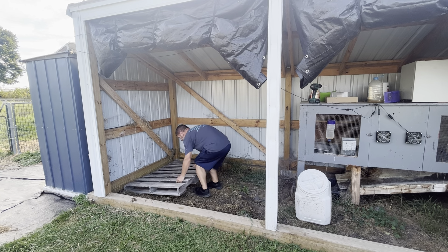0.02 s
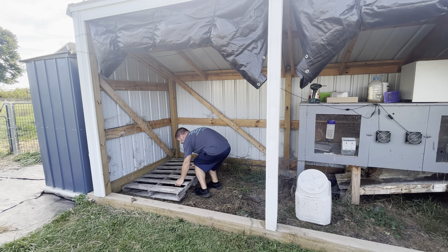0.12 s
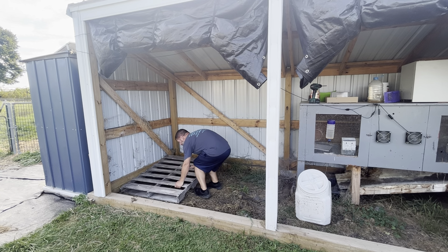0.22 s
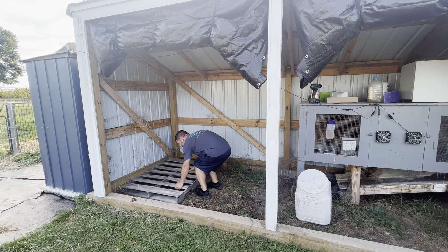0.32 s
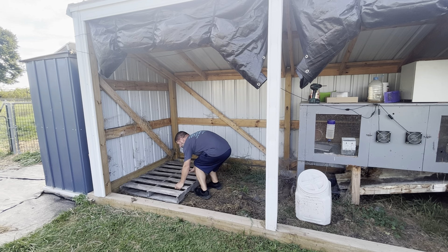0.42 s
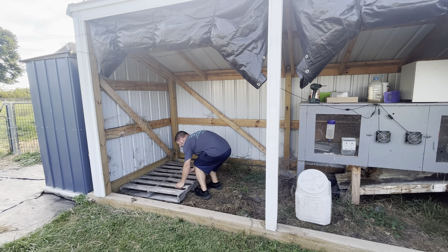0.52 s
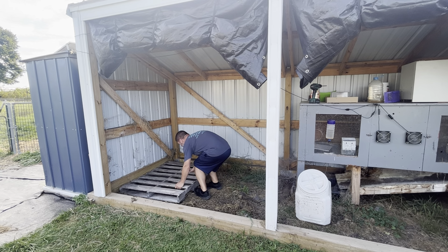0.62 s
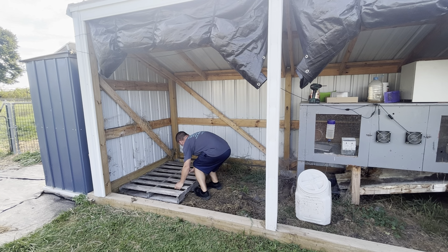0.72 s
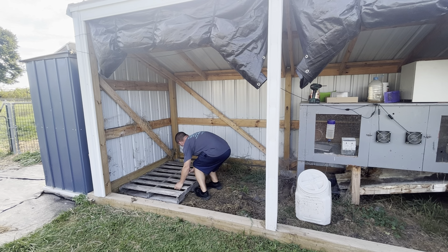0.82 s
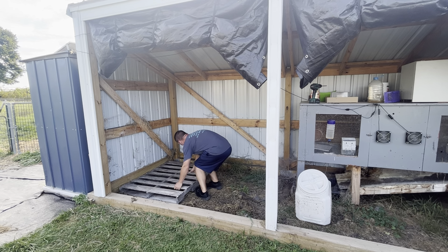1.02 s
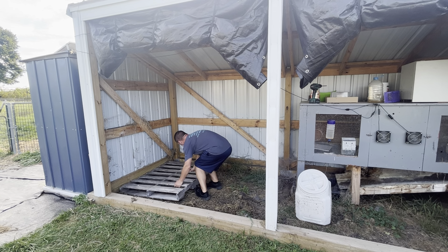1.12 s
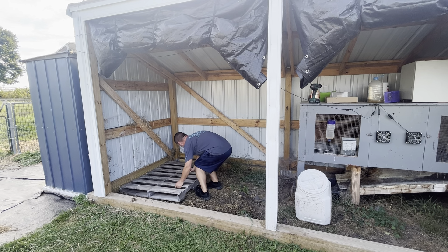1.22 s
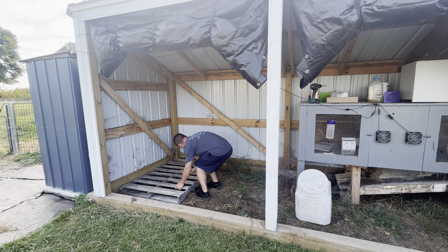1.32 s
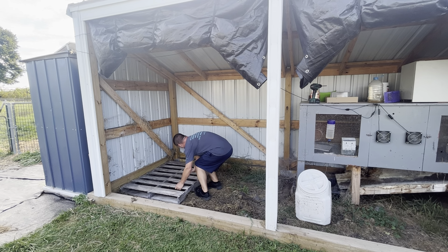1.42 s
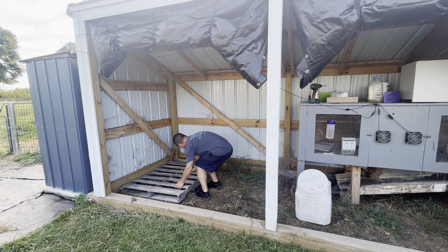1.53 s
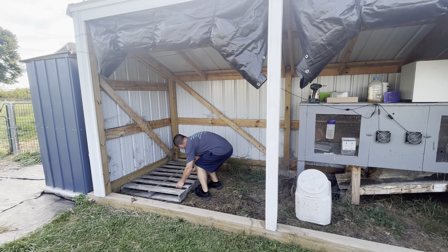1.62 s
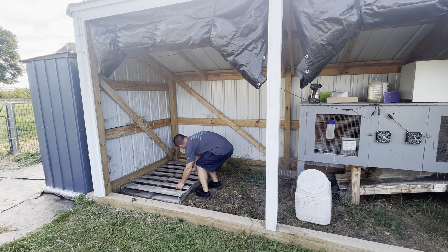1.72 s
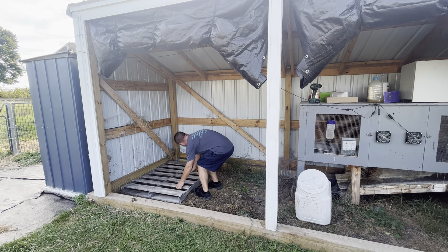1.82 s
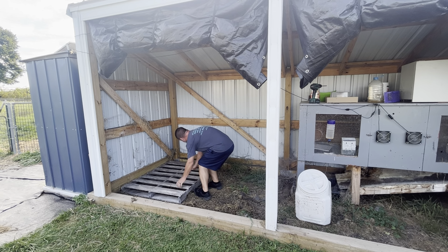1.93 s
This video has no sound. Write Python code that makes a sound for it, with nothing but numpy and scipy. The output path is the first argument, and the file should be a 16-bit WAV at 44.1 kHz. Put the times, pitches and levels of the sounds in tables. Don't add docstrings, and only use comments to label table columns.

```python
import sys
import numpy as np
from scipy import signal
from scipy.fft import rfft, irfft, next_fast_len
from scipy.io import wavfile
from scipy.ndimage import uniform_filter1d

SR = 44100
rng = np.random.default_rng(int(sys.argv[2]) if len(sys.argv) > 2 else 0)


def undo_db(level):
    steps = np.asarray(level, float) / 20
    return 10 ** steps


def waveform_to_disk(signal):
    frames = np.transpose(np.atleast_2d(signal))
    scaled = np.clip(frames, -1, 1) * 32767
    samples = np.round(scaled).astype(np.int16)
    wavfile.write(sys.argv[1], SR, samples)


N = 85995


def at(table, hz):
    points = np.array(table)
    return np.interp(np.log(hz + 1), np.log(points[:, 0]), points[:, 1])


def unit(x):
    return x / np.sqrt(np.mean(x ** 2))


def colour(x, gain):
    n = next_fast_len(x.shape[-1] + 4096, True)
    spectrum = rfft(x, n) * gain(np.fft.rfftfreq(n, 1 / SR))
    return irfft(spectrum, n)[..., :x.shape[-1]]


def pair(size):
    # frequency in Hz, likeness of the channels from 0 to 1.
    alike = [(40, 0.77), (125, 0.98), (300, 0.72), (600, 0.033), (2000, 0.47), (8000, 0.067), (12000, 0.65)]
    likeness = lambda hz: np.clip(at(alike, hz), 0, 1)
    mid, side = rng.standard_normal((2, size))
    mid = colour(mid, lambda hz: np.sqrt(1 + likeness(hz)))
    side = colour(side, lambda hz: np.sqrt(1 - likeness(hz)))
    return np.array([mid + side, mid - side]) / np.sqrt(2)


def walk(rate):
    hold = int(SR / rate)
    steps = np.repeat(rng.standard_normal(N // hold + 1), hold)
    return unit(uniform_filter1d(uniform_filter1d(steps, hold), hold)[:N])


def pan(db):
    return undo_db(np.array([[db / 2], [-db / 2]]))


def air():
    # frequency in Hz, level in dB per Hz.
    air_curve = [(25, -35), (45, -11), (100, 4.5), (200, -6), (350, -24.5), (1500, -26), (6000, -37),
                 (14000, -42.5)]
    floor = colour(pair(N), lambda hz: undo_db(at(air_curve, hz)) * (hz > 22))
    return undo_db(-47 + walk(2.8)) * unit(floor)


def far_chorus():
    # centre in Hz, width in Hz, level in dB, throbs per second, throb depth in dB,
    # left minus right in dB.
    chorus = [
        (4830, 890, -61, 32, 2.5, 5),
        (8190, 1660, -56.5, 120, 2, -5),
        (8636, 1680, -60.5, 240, -2, -14.5),
    ]
    out = 0
    for centre_hz, width_hz, db, rate, throb_db, pan_db in chorus:
        band = unit(colour(pair(N), lambda hz: 1 / (1 + ((hz - centre_hz) / width_hz * 2) ** 4)))
        out = out + undo_db(db + throb_db * walk(rate) + 0.5 * walk(2.6)) * band * pan(pan_db)
    return out


def scuffs():
    # start in seconds, length in seconds, level in dB, tilt in dB per octave.
    scuff_rows = [
        (-.05, 0.96, -50, -4.5),
        (0.241, 0.092, -26, -10),
        (0.382, 0.088, -29.5, -25),
        (0.464, 0.11, -40.5, -10),
        (.85, 0.15, -54, -5.5),
        (1.15, 0.056, -50.5, -9.5),
        (1.277, .11, -51.5, -5),
        (1.648, 0.12, -38.5, -10),
    ]
    t, out = np.arange(N) / SR, 0
    for start, length, db, tilt_db in scuff_rows:
        tilt = lambda hz: undo_db(tilt_db * np.log2(hz / 1000 + 0.5)) * hz / (hz + 500)
        hiss = unit(colour(pair(N), tilt))
        swell = np.sin(np.pi * np.clip((t - start) / length, 0, 1) ** 0.56)
        out = out + undo_db(db + 2 * walk(120)) * swell * hiss
    return out


def shower(start, t60, per_s):
    t = np.arange(N) / SR - start
    scatter_db = 6
    size = undo_db(scatter_db * np.tanh(rng.standard_normal(N))) * rng.choice([-1, 1], N)
    hits = rng.random(N) < per_s / SR
    return hits * size * (t > 0) * undo_db(-60 * np.maximum(t, 0) / t60)


def push(t, contact_ms):
    contact_s = contact_ms / 1000
    return np.maximum(t, 0) / contact_s ** 2 / SR * np.exp(-np.abs(t) / contact_s)


def blow_forces():
    # start in seconds, level in dB, contact in ms, rattle level in dB, rattle t60 in seconds.
    blows = [(0.011, -53, 0.31, 1.5, 0.13), (0.2459, -9.5, 0.14, -10.5, 0.39),
             (0.365, -18, 0.74, -13, 0.76), (0.425, -30.5, 0.36, -7.5, 0.86), (0.543, -37.5, .6, 0, 0.55),
             (.654, -66, .6, -14, 0.52), (1.158, -20, 0.69, -17, 0.46), (1.181, -22, 0.86, -15.5, 0.29),
             (1.232, -29.5, 0.79, -14, 0.82), (1.6218, -14, .5, -14.5, 0.26), (1.646, -24, 0.65, -8, 0.46),
             (1.717, -31.5, 0.48, -6, 0.36), (1.761, -34, 0.87, -9, 0.3), (1.894, -48.5, 0.24, -12, 0.1)]
    t, out = np.arange(N) / SR, np.zeros(N)
    for start, db, contact_ms, rattle_db, t60 in blows:
        clicks = shower(start, t60, per_s=500)
        rattle = signal.oaconvolve(clicks, push(t[:400], contact_ms * 0.63))[:N]
        out += undo_db(db) * (push(t - start, contact_ms) + undo_db(rattle_db - 3) * rattle)
    return out


def bend(blows):
    late_s, knee_hz = 0.00768, 136
    return colour(blows, lambda hz: np.exp(-2j * np.pi * late_s * knee_hz * np.log(1 + hz / knee_hz)))


def nudge_gain(db):
    nudges_from_s = 1.1
    return np.where(np.arange(N) / SR < nudges_from_s, 1, undo_db(db))


def ring(x, hz, t60):
    pole = np.exp(2j * np.pi * hz / SR - np.log(1000) / (t60 * SR))
    return signal.lfilter([1], [1, -pole], x).imag


def wood(force):
    # frequency in Hz, level in dB, t60 in seconds, left minus right in dB.
    pallet_modes = [(151.6, -13, 0.25, -3), (241.3, -2, 0.11, -2), (287.4, 0, 0.068, -4.5),
                    (361.4, 2.5, 0.082, -1.5), (428.3, -3, 0.071, -11), (506.6, -0.5, 0.064, -10),
                    (649.7, -10, 0.058, -20), (814, -7.5, 0.039, -20.5), (908, -10, 0.1, 11),
                    (994, -8, 0.12, -11.5), (1213, 0.5, 0.031, -5), (1401, -8.5, 0.048, -16),
                    (1699, -11.5, 0.016, 22), (2190, -11.5, 0.018, 9)]
    out = 0
    for k, (hz, db, t60, pan_db) in enumerate(pallet_modes):
        out = out + (-1) ** k * undo_db(db + 0.5) * pan(pan_db) * ring(force, hz, t60)
    return out


def sheet_boom(force):
    # frequency in Hz, level in dB, t60 in seconds.
    sheet_modes = [(43.05, -15.5, 2.09), (64.1, -20.5, 0.79), (86.8, -20.5, 0.81), (97.7, -16, 1.57),
                   (115, -19.5, 0.62), (142.5, -24.5, 0.62), (180.5, -19, 1.29), (218, -21.5, 0.69),
                   (275.5, -17.5, 0.49)]
    shaken = force * nudge_gain(-7)
    return sum((-1) ** k * undo_db(db) * ring(shaken, hz, t60) for k, (hz, db, t60) in enumerate(sheet_modes))


def slat_clack():
    # frequency in Hz, level in dB, t60 in seconds.
    slat_modes = [(660, 0.5, .02), (900, -1, .02), (1220, -2, .02), (1510, -5.5, .02), (1780, -6.5, .02),
                  (2123, -5.5, .02), (2340, -14.5, .02), (2500, -3.5, .02), (2930, 0, .02),
                  (3250, -4.5, .02), (5100, -17, 0.014)]
    start, rise_s, longest_ring_s = 1.67, 0.0035, 0.014
    rise = np.clip((np.arange(N) / SR - start) / rise_s, 0, 1)
    knocks = undo_db(-26) * shower(start, t60=0.096, per_s=5000) * rise
    out = 0
    for k, (hz, db, t60) in enumerate(slat_modes):
        out = out + (-1) ** k * undo_db(db) * ring(knocks, hz, min(t60, longest_ring_s))
    spit = colour(knocks, lambda hz: hz / (hz + 500) / (1 + (hz / 3300) ** 4) ** 0.5)
    return out + undo_db(10.5) * spit


def grit(blows):
    t60, top_hz = 0.21, 1855
    fall = np.exp(-np.log(1000) / (t60 * SR))
    thrown = signal.lfilter([1], [1, -fall], np.abs(blows) * nudge_gain(-12))
    flutter = undo_db(1.5 * walk(90))
    hiss = colour(pair(N), lambda hz: hz / (hz + 600) / (1 + (hz / top_hz) ** 2))
    return undo_db(-12) * thrown * flutter * hiss


def shed(x):
    # frequency in Hz, level in dB.
    echo_colour = [(30, -12), (100, -2), (300, 0), (700, -3), (1500, 0.9), (3000, -4), (6000, -14),
                   (14000, -26)]
    # frequency in Hz, t60 in seconds.
    echo_t60 = [(40, 3.6), (90, 2.7), (200, 2.42), (500, 0.7), (1500, 0.59), (3500, 0.19), (12000, 0.19)]
    size = int(1.4 * SR)
    t, noise, tail = np.arange(size) / SR, pair(size), 0
    for centre_hz in 31 * 2.0 ** np.arange(10):
        octaves = lambda hz: np.clip(np.log2((hz + 1) / centre_hz), -1, 1)
        band = colour(noise, lambda hz: np.cos(np.pi / 2 * octaves(hz)) ** 2 * undo_db(at(echo_colour, hz)))
        tail = tail + band * undo_db(-60 * t / at(echo_t60, centre_hz))
    build_up = np.minimum(t / 0.036, 1)
    return signal.fftconvolve(x[None], tail * build_up * undo_db(-30), axes=1)[:, :N]


def pallet():
    blows = blow_forces()
    force = bend(blows)
    boards, boom = wood(force), sheet_boom(force)
    clack, dirt = slat_clack(), grit(blows)
    near = boards + clack * pan(-4)
    left_late_s = 0.000491
    left = colour(near[0], lambda hz: np.exp(-2j * np.pi * hz * left_late_s))
    echo = shed(undo_db(23.5) * force + undo_db(-13.5) * clack + dirt[0])
    return np.array([left, near[1]]) + boom + dirt + echo


def strokes(rows, hz, sag_hz):
    t, out = np.arange(N) / SR, 0
    for start, length, db in rows:
        u = np.clip((t - start) / length, 0, 1)
        cycles = length * (hz * u - sag_hz * u ** 3 / 3)
        out = out + undo_db(db) * np.sin(np.pi * u ** 0.81) * np.sin(2 * np.pi * cycles)
    return out


def high_cricket():
    # time in seconds, peak level in dB.
    ticks = [(0.0453, -42.5), (0.1004, -38.5), (0.157, -39.5), (0.2082, -37.5), (0.2656, -36),
             (0.856, -59.5), (0.9028, -49), (0.9561, -45), (1.004, -46), (1.0593, -45), (1.1069, -45.5),
             (1.1667, -43), (1.22, -45), (1.275, -43.5), (1.3349, -43), (1.3937, -42), (1.448, -42),
             (1.5032, -43), (1.5611, -42.5), (1.616, -43), (1.6711, -40), (1.725, -42), (1.7863, -38.5),
             (1.8407, -39.5), (1.8938, -38)]
    rows = [(s - 0.003, 0.016, db - 11) for s, db in ticks]
    return strokes(rows, hz=8115, sag_hz=157) * pan(-26.5)


def low_cricket():
    # start in seconds, level in dB.
    phrases = [(.048, -48), (.563, -47), (.875, -47.5), (1.246, -46.5), (1.523, -46.5)]
    # delay in seconds, length in seconds, level in dB.
    phrase_strokes = [
        (0, 0.031, -3.5),
        (0.044, 0.016, 0),
        (0.082, 0.0237, -1.5),
        (0.13, 0.036, -14),
    ]
    rows = []
    for start, db in phrases:
        for delay, length, stroke_db in phrase_strokes:
            rows.append((start + delay, length, db + stroke_db + 6.5))
    low = strokes(rows, hz=4997, sag_hz=563)
    return np.array([low, np.roll(low, 7)]) * pan(3)


def crickets():
    near = low_cricket() + high_cricket()
    echo_t60 = 0.13
    echo = rng.standard_normal((2, 4000)) * undo_db(-36 - 60 * np.arange(4000) / SR / echo_t60)
    return near + signal.fftconvolve(near, echo, axes=1)[:, :N]


def scene():
    return air() + far_chorus() + scuffs() + pallet() + crickets()


def band_limit(x):
    return signal.sosfilt(signal.butter(12, 15190, fs=SR, output="sos"), x)


def record(dry):
    x = signal.sosfilt(signal.butter(2, 33, "high", fs=SR, output="sos"), dry)
    ceiling = 0.93
    x = x / (1 + (x / ceiling) ** 4) ** 0.25
    mix = signal.sosfilt(signal.ellip(8, 0.2, 70, 14600, fs=SR, output="sos"), x)
    return band_limit(mix)


dry = scene()
out = record(dry)
waveform_to_disk(out)
```